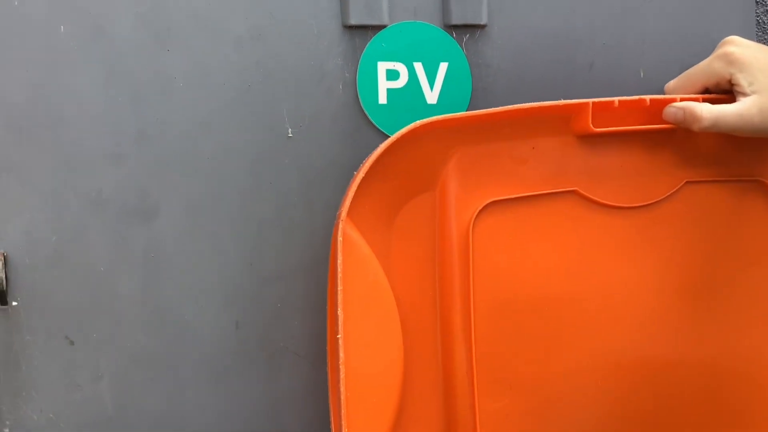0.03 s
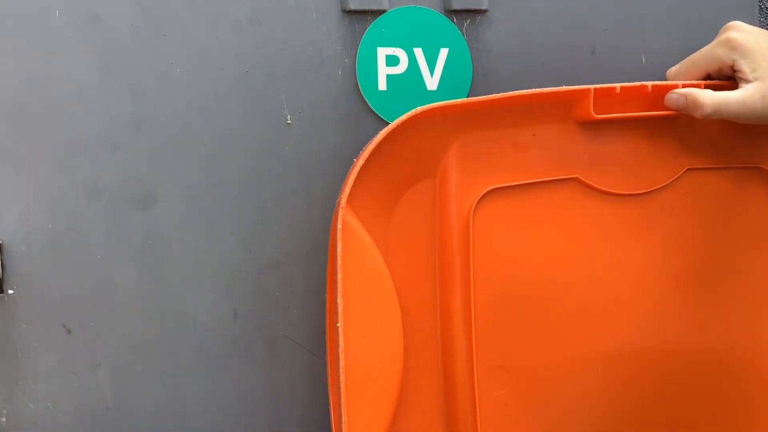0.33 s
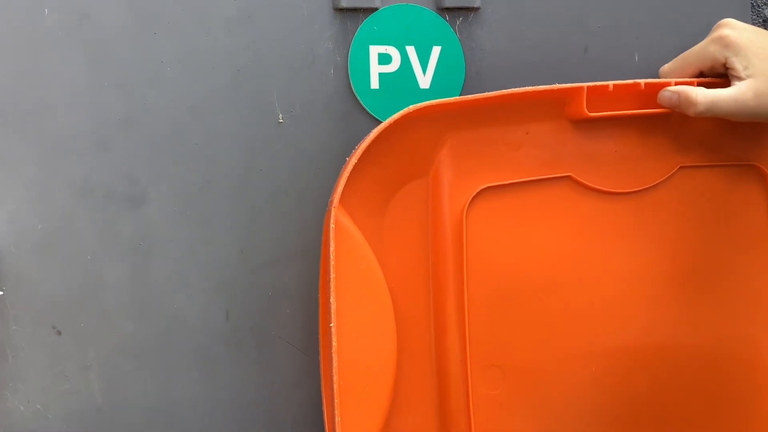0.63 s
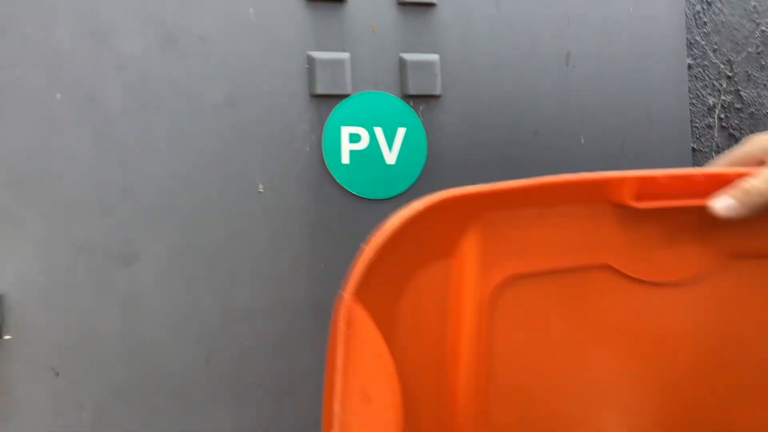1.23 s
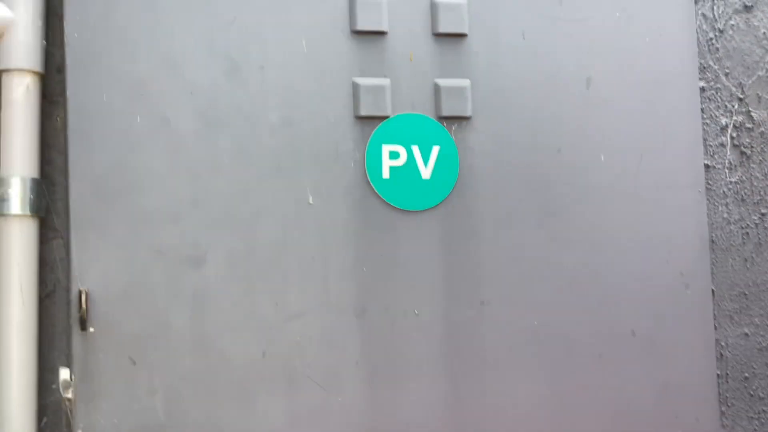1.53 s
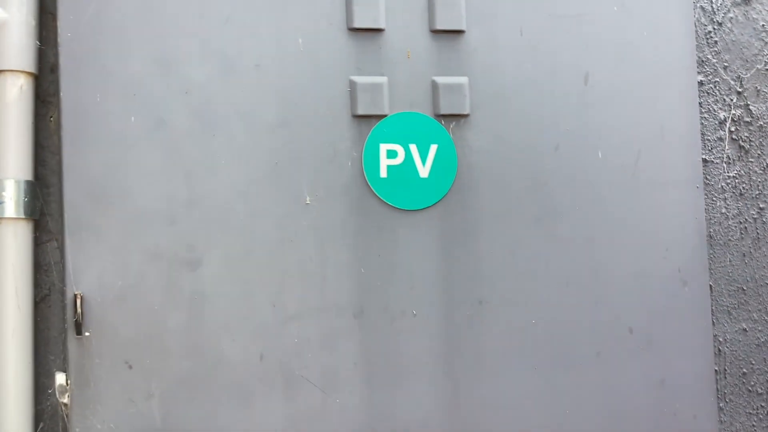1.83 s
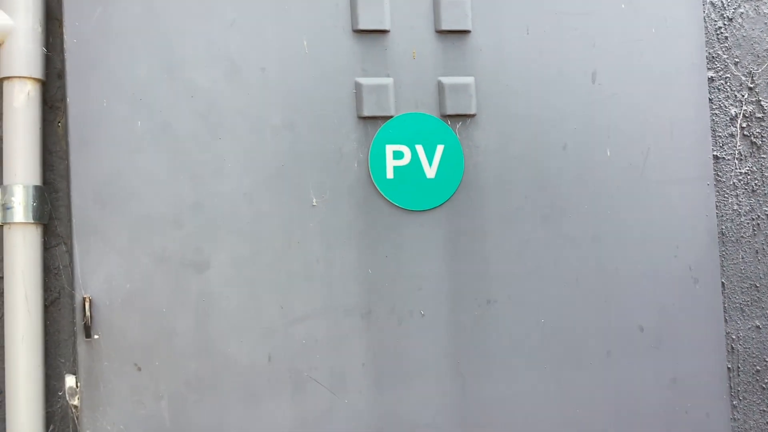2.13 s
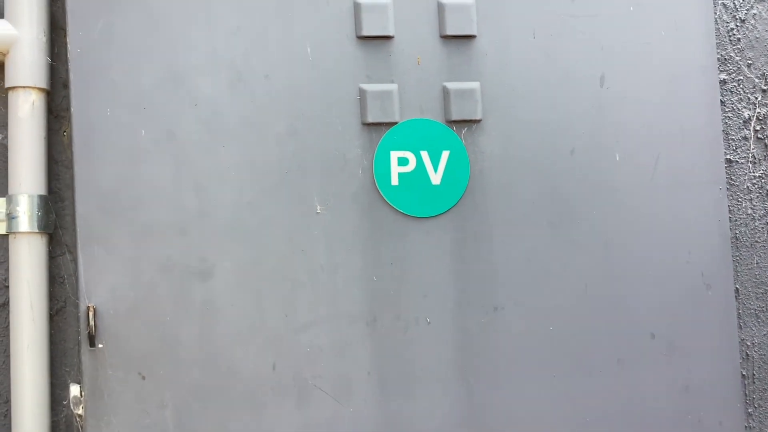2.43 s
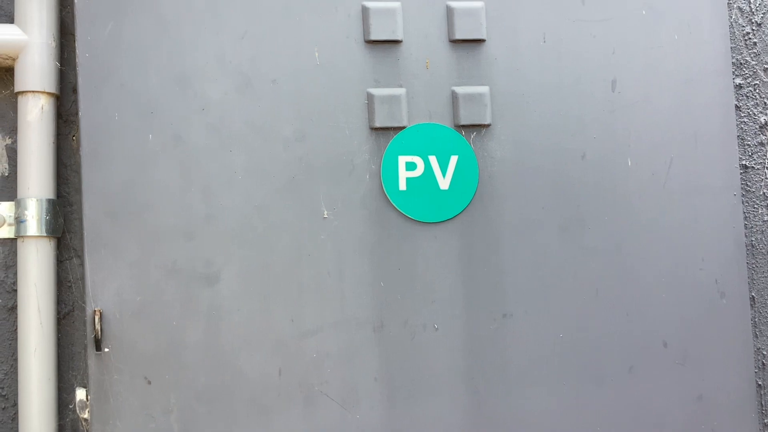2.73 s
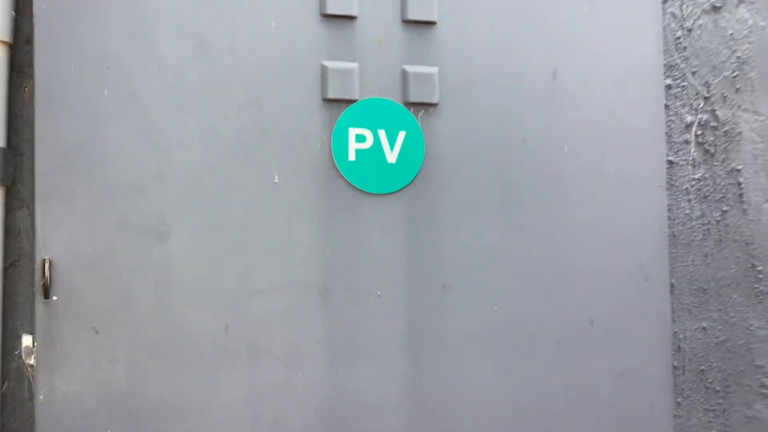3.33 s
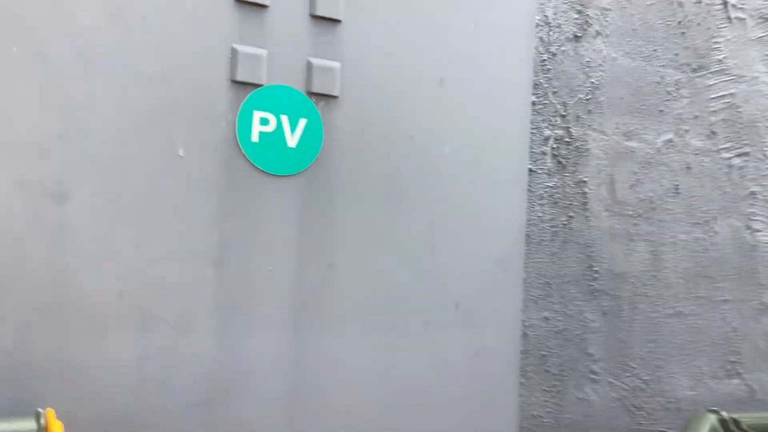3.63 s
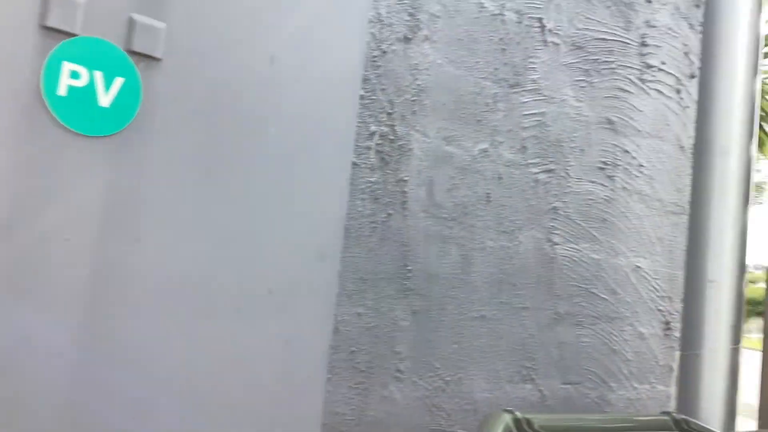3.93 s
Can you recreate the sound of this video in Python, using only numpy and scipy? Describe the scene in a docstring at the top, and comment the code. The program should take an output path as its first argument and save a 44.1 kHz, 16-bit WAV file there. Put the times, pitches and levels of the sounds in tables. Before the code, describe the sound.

Plastic bin lid scraping, rattling and then slamming shut, with distant birds twittering.

```python
"""A plastic wheelie bin in a yard, heard from a hand-held phone. Small birds twitter in the distance
over quiet air and sleeve rustle. In the first second fingers tap the phone and ring its case. From 1.3 s
the lid swings down with a scrape, rim clacks and a falling swish; the hollow bin rumbles and the lid
settles with soft knocks. Near 3.2 s a lid bangs shut, ringing its modes and the plastic panels,
and a scratchy hiss follows as the phone turns away."""
import sys
import numpy as np
from scipy import signal
from scipy.fft import rfft, irfft
from scipy.io import wavfile
from scipy.ndimage import uniform_filter1d, map_coordinates

SR = 44100
rng = np.random.default_rng(int(sys.argv[2]) if len(sys.argv) > 2 else 0)


def dump_mix(stems):
    """Bounce the given channels to the path in sys.argv[1] as a 16-bit WAV at rate SR."""
    frames = np.atleast_2d(stems).T  # one column per channel
    limited = np.clip(frames, -1, 1)  # hard clip at full scale
    pcm = np.round(limited * 32767).astype(np.int16)
    wavfile.write(sys.argv[1], SR, pcm)


N = 176400


def lid_bang():
    """The lid lands edge by edge and bounces once; each contact rings its modes and panels."""
    # contacts of the closing lid: start_s, level_db
    hits = [(3.173, -23), (3.1795, -4), (3.1843, -1), (3.1868, -4), (3.208, -11)]
    # modes of the lid on the bin: pitch_hz, relative_db, t60_s
    lid_modes = [(89.8, -20, 0.455), (113, -9, 0.1), (173, -18, 0.18), (208.6, -22, 0.25),
                 (282.5, -18.5, .28), (526, -14, 0.13), (625, -14, 0.2), (770, 1, 0.081), (813, -14.5, 0.3),
                 (832, -4, 0.037), (1003.4, -4, 0.15), (1102, -13, .16), (1520, -13.5, .19),
                 (1570, -16, 0.153), (1677, -10, 0.097), (1830, -12, 0.11), (2225, -21.5, 0.25),
                 (2830, -22, .15), (4620, -13.5, 0.038)]
    # dense ring of the plastic panels: band_hz, relative_db, t60_s
    panels = [(60, -12, 0.92), (131, -2.5, 0.48), (298, -6, 0.317), (520, -3.5, 0.24), (756, 3.5, 0.17),
              (1200, -2.5, 0.17), (2120, -2.5, 0.12), (3320, -15.5, 0.16), (4700, -18, 0.051),
              (7000, -27.5, 0.052), (16000, -52, .05)]
    modes_db, panels_db, detune = -20, -25, 0.0046
    out = np.zeros(N)
    for start, hit_db in hits:
        modes = [(hz * (1 + detune * rng.standard_normal()), db, t60) for hz, db, t60 in lid_modes]
        add(out, start, amp(hit_db + modes_db) * contact(ring(modes)))
        add(out, start, amp(hit_db + panels_db) * contact(dense_ring(panels)))
    return out


def lid_scrape():
    """The lid slides on its hinge and rim in an uneven stream of tiny slips."""
    # scrape envelope: time_s, level_db
    envelope = [(1.28, -79), (1.32, -51), (1.345, -45), (1.43, -39), (1.55, -39.5), (1.62, -38),
                (1.65, -54), (1.71, -46.5), (1.79, -51.5), (1.86, -59), (1.95, -67)]
    # scrape tone: band_hz, relative_db
    tone = [(60, -8), (300, -1.5), (800, -4.5), (1600, 3), (2800, -2), (4000, -7.5), (5200, -9),
            (6500, -14), (10000, -18.5), (16000, -32.5)]
    slips = colour(grains(per_s=5000, spread_db=2), tone)
    return slips * level(envelope) * amp(1.14 * wander(per_s=70))


def rim_clacks():
    """Rim and hinge knock: a short pitched ring with a noisy crack."""
    # clacks: start_s, ring_db, pitch_hz, crack_db
    clacks = [(0.9038, -40, 1350, -40), (1.325, -45, 1410, -45.5), (1.4046, -43, 1430, -28.5),
              (1.4082, -21.5, 1402, -50), (1.411, -25, 1470, -33.5), (1.559, -28, 1540, -40),
              (1.572, -26, 1260, -33), (1.585, -38, 1490, -35), (1.598, -29, 1230, -47),
              (1.608, -16.5, 1190, -28.5), (1.613, -28, 1174, -37), (3.698, -61, 1670, -41)]
    # modes of the rim: pitch_ratio, relative_db, t60_s
    rim_modes = [(1, -1, .035), (1.269, -7.5, 0.049), (1.72, -22, 0.035), (2.5, -29, .018)]
    # crack of the rim: band_hz, relative_db, t60_s
    crack = [(100, -7.5, 0.3), (503, -3.5, 0.074), (1620, 5.5, 0.13), (3000, 1.5, 0.026),
             (5100, -6.5, 0.057), (8000, -16, 0.075), (16000, -21.5, .02)]
    out = np.zeros(N)
    for start, ring_db, hz, crack_db in clacks:
        rim = ring([(hz * ratio, db, t60) for ratio, db, t60 in rim_modes])
        add(out, start, amp(ring_db) * rim + amp(crack_db) * dense_ring(crack, size=len(rim)))
    return out


def bin_rumble():
    """Each jolt swells into a low rumble of the hollow bin."""
    # jolts: start_s, level_db, rise_s
    jolts = [(1.34, -41.5, 0.0343), (1.409, -44.5, 0.0088), (1.636, -34.5, .018), (1.682, -37, 0.009),
             (2.04, -45, 0.0086), (3.13, -46.5, 0.018)]
    # hollow body of the bin: band_hz, relative_db, t60_s
    body = [(35, -36, .8), (63, 0.5, 1), (114.4, 3, 0.86), (190, -3, 0.96), (450, -9.5, 0.73),
            (693, -10, 0.816), (1170, -16, 0.62), (2500, -29.5, 0.85), (6000, -60, .2)]
    out = np.zeros(N)
    for start, db, rise in jolts:
        add(out, start, amp(db) * dense_ring(body) * np.minimum(seconds(1) / rise, 1))
    return out


def lid_settle():
    """The lid settles with dull knocks that leave one mode of the bin ringing."""
    # soft knocks: start_s, level_db
    knocks = [(2.021, -46.5), (2.039, -42.5)]
    # their dull ring: band_hz, relative_db, t60_s
    thud = [(100, -2.5, 0.32), (690, 1, 0.13), (1500, -4.5, 0.07), (3000, -23, 0.114), (12000, -37, .03)]
    # lingering mode of the bin: pitch_hz, relative_db, t60_s
    tail = [(675, -10.5, 0.8)]
    out = np.zeros(N)
    for start, db in knocks:
        add(out, start, amp(db) * contact(dense_ring(thud)))
        add(out, start, amp(db) * ring(tail))
    return out


def lid_swish():
    """Noise in one broad, hollow resonance that drops as the lid falls."""
    # downward sweep: time_s, centre_hz, level_db
    sweep = [(1.55, 1894, -61.5), (1.575, 1600, -41), (1.6, 1349, -37), (1.62, 1154, -34),
             (1.638, 850, -36.5), (1.655, 480, -42), (1.689, 296, -60)]
    times, hz, db = np.array(sweep).T
    t = np.arange(N) / SR
    cycles = np.cumsum(np.interp(t, times, hz)) / SR
    steps_per_cycle = .6  # sets the width of the resonance
    steps = rng.standard_normal((2, 8000))
    a, b = (map_coordinates(row, [cycles * steps_per_cycle], mode="wrap") for row in steps)
    band = a * np.cos(2 * np.pi * cycles) + b * np.sin(2 * np.pi * cycles)
    return band * np.interp(t, times, amp(db), left=0, right=0)


def finger_taps():
    """Each tap ticks, rings the phone's case and thumps the microphone."""
    # taps: start_s, thump_db, case_db, tick_db
    taps = [(.0505, -43.5, -28.5, -25), (0.763, -58, -39, -43), (.7775, -31.5, -27.5, -44),
            (.7905, -23.5, -18.5, -43), (0.8427, -58, -40, -25)]
    # thump at the microphone: pitch_hz, relative_db, t60_s
    thump_modes = [(137, 3.5, 0.055), (225.6, -1.5, 0.032)]
    # modes of the case: pitch_hz, relative_db, t60_s
    case_modes = [(573, -6.5, .03), (796, 0, 0.019), (910, -22, 0.018), (2100, -0.5, 0.0057)]
    # tick tone: band_hz, relative_db
    tick_tone = [(300, -3), (2200, 1.5), (4200, -0.5), (6500, -9), (11000, -11), (16000, -47)]
    out, t = np.zeros(N), seconds(.5)
    thump = low_cut(ring(thump_modes) * np.minimum(t / 0.0037, 1), hz=90)
    case = low_cut(contact(ring(case_modes)), hz=483)
    for start, thump_db, case_db, tick_db in taps:
        tick = contact(colour(rng.standard_normal(len(t)), tick_tone) * decay(t, t60_s=0.0077))
        add(out, start, amp(thump_db) * thump - amp(case_db) * case + amp(tick_db) * tick)
    return out


def birds():
    """Distant whistles and twitters, blurred by the walls of the yard."""
    # whistled notes: start_s, length_s, from_hz, to_hz, level_db, roughness (0-1)
    notes = [(0.333, 0.162, 2193, 2250, -66, .06), (.47, 0.234, 2277, 2392, -62, 0),
             (1.057, 0.089, 5230, 3800, -51.5, 0.44), (1.907, 0.13, 4600, 3830, -62, 0.47),
             (2.046, .06, 2190, 2950, -60, .1), (2.107, 0.11, 4480, 3623, -63.5, .3),
             (2.269, 0.057, 2290, 2964, -55.5, 0.17), (2.309, 0.12, 4100, 4220, -56.5, 0.41),
             (2.43, 0.08, 4380, 5090, -56.5, 0.45), (2.492, .065, 4600, 3606, -50, 0.38),
             (2.744, 0.073, 2500, 3015, -59, 0.02), (2.954, 0.074, 2339, 3090, -60.5, 0.31),
             (3.258, .12, 4132, 3720, -60, .3)]
    # spells of harsh twittering: start_s, length_s, level_db
    spells = [(0, 0.3, -59.5), (0.236, 0.34, -59.5), (0.661, .2, -59), (2.562, 0.15, -52.5),
              (2.764, 0.068, -50.5), (2.841, 0.059, -49.5)]
    out, t = np.zeros(N), seconds(1)
    for start, length, from_hz, to_hz, db, roughness in notes:
        add(out, start, amp(db) * whistle(length, from_hz, to_hz, roughness))
    for start, length, db in spells:
        add(out, start, amp(db) * twitter(length))
    walls = unit(rng.standard_normal(len(t)) * decay(t, t60_s=0.31)) / np.sqrt(len(t))
    reverb = signal.fftconvolve(out, walls)[:N]
    wet, trim = amp(3), amp(0.5)
    return trim * (out + wet * reverb) / np.hypot(1, wet)


def whistle(length, from_hz, to_hz, roughness):
    """One gliding, warbling bird note with a faint octave overtone, at rms 1."""
    progress = seconds(length) / length
    glide_hz = from_hz + (to_hz - from_hz) * np.sin(np.pi / 2 * progress)
    warble = 1 + roughness * 0.2009 * wander(per_s=420, size=len(progress))
    phase = 2 * np.pi * np.cumsum(glide_hz * warble) / SR
    tone = np.sin(phase) + amp(-22.5) * np.sin(2 * phase)
    return unit(np.sqrt(np.sin(np.pi * progress)) * tone)


def twitter(length):
    """A raspy spell of tiny overlapping chips at scattered pitches, at rms 1."""
    # range and balance of the chips: pitch_hz, relative_db
    tone = [(2000, -5.5), (2900, 1.5), (3400, -1), (5000, 3), (6000, -5), (8200, -18), (12000, -28)]
    chips_per_s, chip_s, bend, spread_db = 1700, .014, .08, 6
    low_hz, high_hz = tone[0][0], tone[-1][0]
    out, t = np.zeros(int(length * SR)), seconds(chip_s)
    for when, pitch, glide, strength in rng.random((int(chips_per_s * length), 4)):
        hz = low_hz + (high_hz - low_hz) * pitch
        phase = 2 * np.pi * hz * (t + bend * (2 * glide - 1) * t ** 2 / chip_s)
        gain = amp(on_log(hz, tone) + spread_db * strength)
        add(out, when * (length - chip_s), gain * np.hanning(len(t)) * np.sin(phase))
    return unit(out * signal.windows.tukey(len(out), .3))


def sleeve_rustle():
    """Sleeve and hand rub close to the phone in fluttering grains."""
    # rustle envelope: time_s, level_db
    envelope = [(0, -62), (.65, -74), (.88, -56.5), (.93, -53), (1.08, -51.5), (1.15, -54.5), (1.22, -61.5),
                (1.8, -70), (2.3, -80), (3, -67.5), (3.12, -55.5), (3.17, -52.5), (3.25, -57), (3.5, -67.5),
                (3.53, -56), (3.63, -61.5), (3.7, -56.5), (3.87, -54.5), (3.94, -59.5), (4, -67)]
    # rustle tone: band_hz, relative_db
    tone = [(60, 2.5), (150, 4.5), (400, -1), (800, 6), (1600, 2.5), (3000, -1), (5000, 1.5), (7000, -8),
            (10000, -10), (12500, -21.5), (16000, -22)]
    slips = colour(grains(per_s=9000, spread_db=3.5), tone)
    return slips * level(envelope) * amp(1.4 * wander(per_s=35))


def turning_hiss():
    """Fine, bright scratching as the phone turns away."""
    # hiss envelope: time_s, level_db
    envelope = [(3.3, -89.5), (3.48, -65.5), (3.53, -57.5), (3.64, -71), (3.7, -54), (3.93, -57),
                (3.97, -73)]
    # hiss tone: band_hz, relative_db
    tone = [(1000, -27), (5000, -2), (8000, -1), (11000, -5), (12500, -6), (14500, -7.5), (16000, -6)]
    return colour(grains(per_s=6200, spread_db=3), tone) * level(envelope)


def outdoor_air():
    """A quiet bed of noise whose level wavers gently."""
    # air tone: band_hz, relative_db
    tone = [(30, 7), (60, 2), (150, -2.5), (350, -5), (700, -2), (1500, -19.5), (3000, 0), (6000, -26.5),
            (10000, -25), (12500, -44), (16000, -49)]
    return amp(-67.5 + 1.4 * wander(per_s=5.95)) * colour(rng.standard_normal(N), tone)


def ring(modes):
    """Damped modes struck at once."""
    t = seconds(.5)
    return sum(amp(db) * decay(t, t60) * np.sin(2 * np.pi * hz * t) for hz, db, t60 in modes)


def dense_ring(table, size=SR, bands=12):
    """Countless modes: noise whose bands each die at their own rate."""
    t, hz = np.arange(size) / SR, np.fft.rfftfreq(size, 1 / SR)
    spectrum = rfft(colour(rng.standard_normal(size), table))
    centres = np.geomspace(50, 16000, bands)
    out = np.zeros(size)
    for centre, pick in zip(centres, np.eye(bands)):
        band = irfft(spectrum * np.interp(np.log(hz + 1), np.log(centres), pick), size)
        out += band * decay(t, on_log(centre, table, column=2))
    return out


def contact(x, contact_s=0.00041):
    """A blow builds up over the time of contact."""
    return x * np.sin(np.pi / 2 * np.minimum(np.arange(len(x)) / SR / contact_s, 1)) ** 2


def grains(per_s, spread_db):
    """Tiny slips at random moments, a few much stronger than the rest."""
    clicks = (rng.random(N) < per_s / SR) * np.sign(rng.standard_normal(N))
    return clicks * amp(spread_db * np.minimum(rng.exponential(size=N), 5))


def wander(per_s, size=N):
    """Smooth random drift at rms 1."""
    hold = int(SR / per_s)
    steps = np.repeat(rng.standard_normal(size // hold + 1), hold)
    return unit(uniform_filter1d(steps, hold)[:size])


def colour(x, table):
    """Give x a spectrum, at rms 1."""
    gain = amp(on_log(np.fft.rfftfreq(len(x), 1 / SR), table))
    return unit(irfft(rfft(x) * gain, len(x)))


def on_log(hz, table, column=1):
    """Read a column of a table on a log-frequency axis."""
    table = np.array(table)
    return np.interp(np.log(hz + 1), np.log(table[:, 0]), table[:, column])


def low_cut(x, hz, order=2):
    """Roll off the lows."""
    return signal.sosfilt(signal.butter(order, hz, "high", fs=SR, output="sos"), x)


def level(points):
    """Gain over time from (time_s, level_db) points."""
    return amp(np.interp(np.arange(N) / SR, *np.array(points).T))


def decay(t, t60_s):
    """Fade by 60 dB every t60_s."""
    return amp(-60 * t / t60_s)


def amp(db):
    """Decibels to gain."""
    return 10 ** (np.asarray(db) / 20)


def unit(x):
    """Scale to rms 1."""
    return x / np.sqrt(np.mean(x ** 2))


def add(out, start, x):
    """Mix x into out at a time in seconds."""
    i = max(int(start * SR), 0)
    out[i:i + len(x)] += x[:len(out) - i]


def seconds(length):
    """Time axis."""
    return np.arange(int(length * SR)) / SR


def scene():
    """Everything at the one microphone."""
    taps = finger_taps()
    swing = lid_scrape() + rim_clacks() + bin_rumble() + lid_settle() + lid_swish()
    return (taps + swing + lid_bang() + birds() + sleeve_rustle() + turning_hiss() + outdoor_air())[None]


def record(dry):
    """The phone cuts the deep bass and the very top."""
    high_cut = signal.ellip(10, .2, 70, 15850, fs=SR, output="sos")
    return signal.sosfilt(high_cut, low_cut(dry, hz=52, order=7))


dry = scene()
out = record(dry)
dump_mix(out)
```